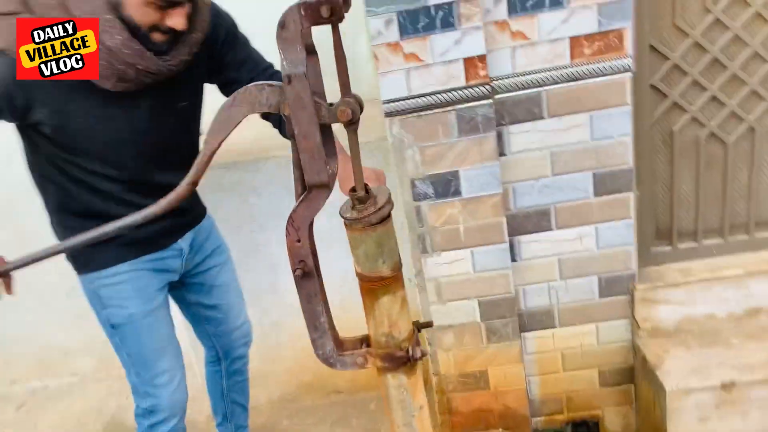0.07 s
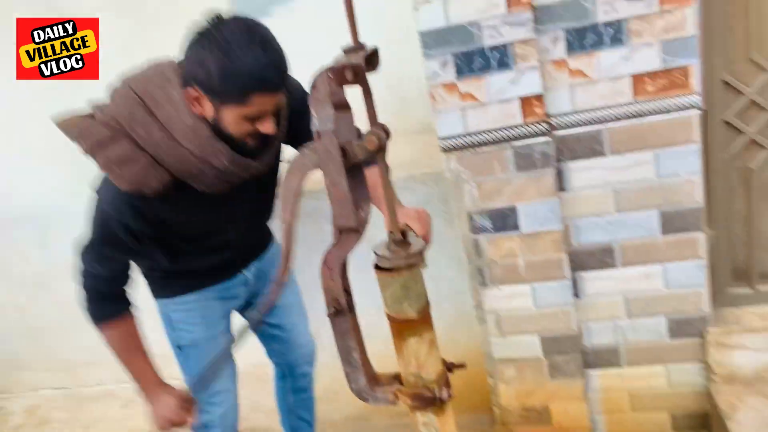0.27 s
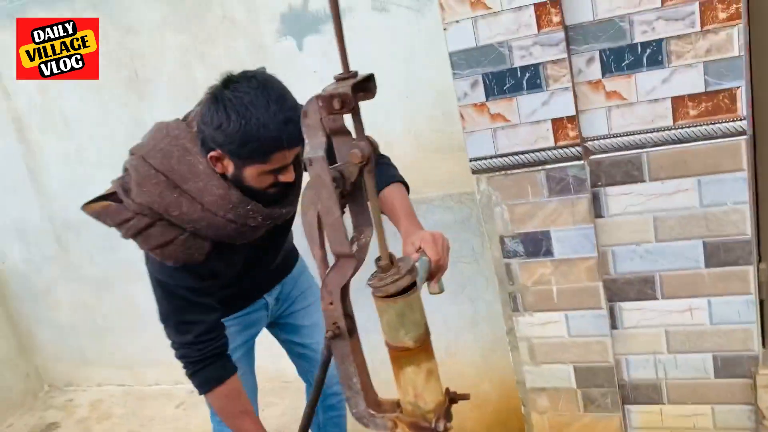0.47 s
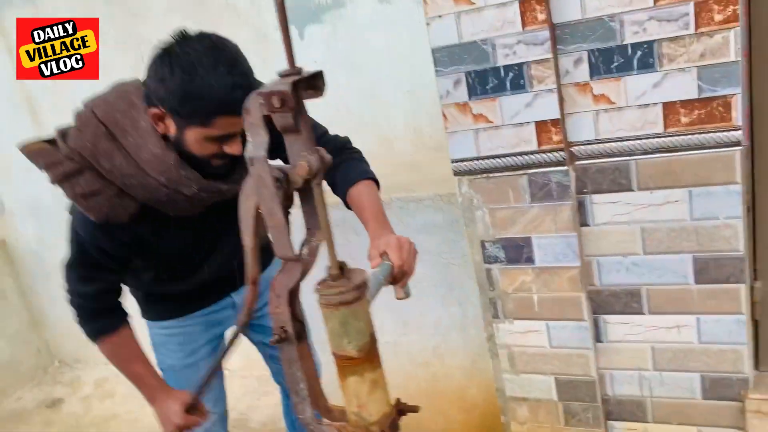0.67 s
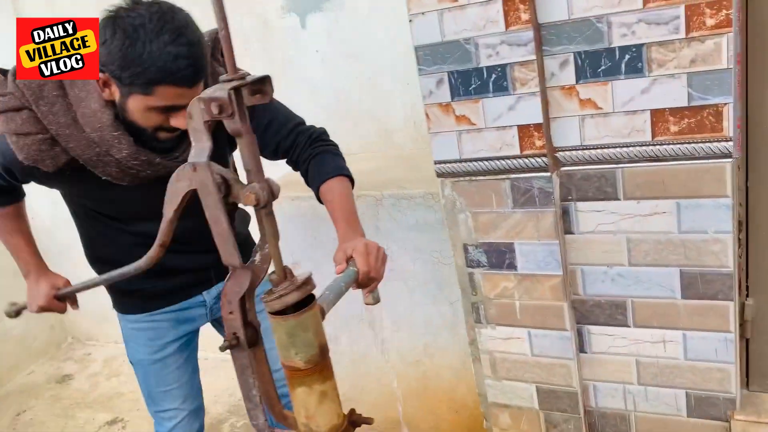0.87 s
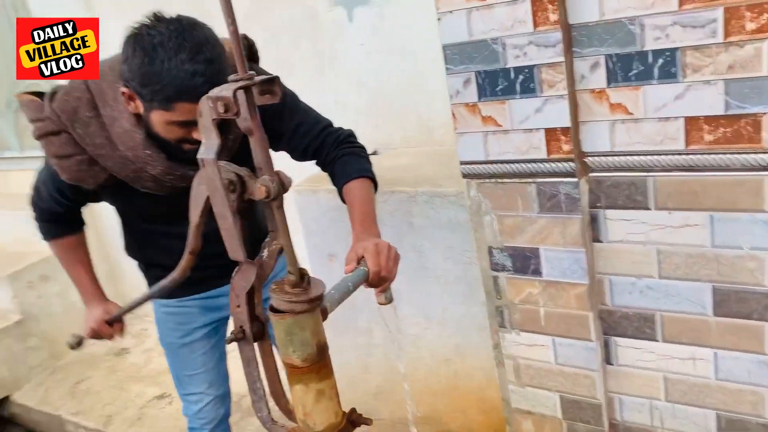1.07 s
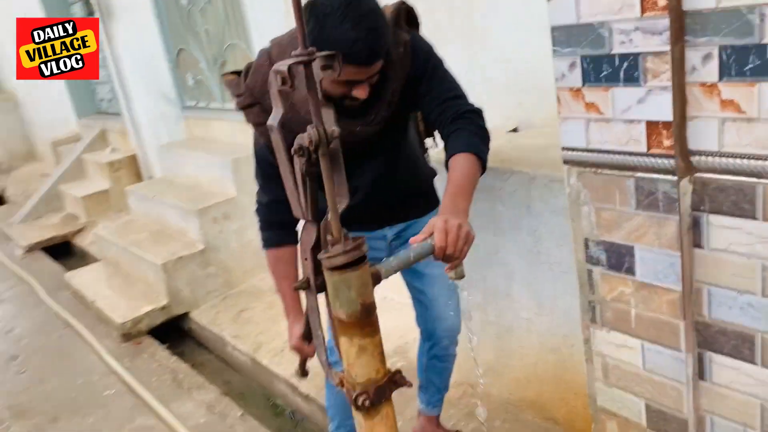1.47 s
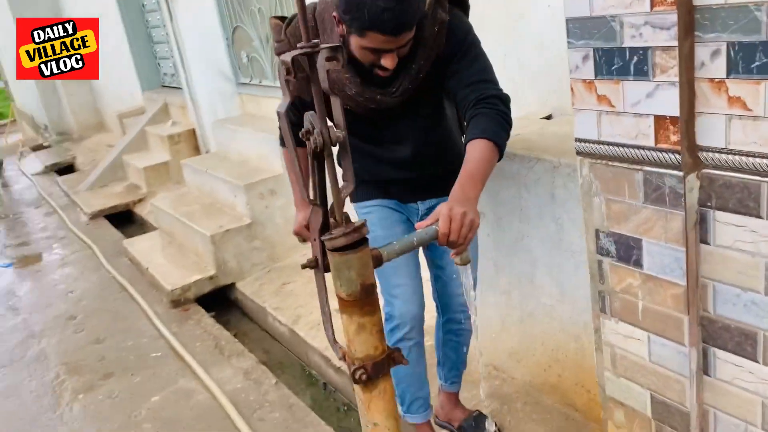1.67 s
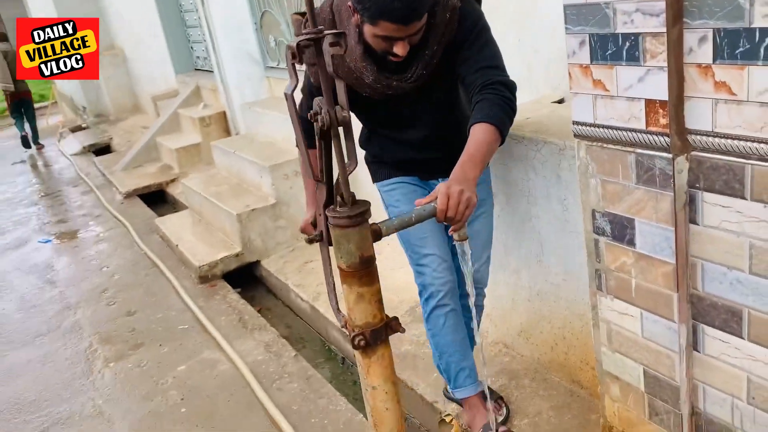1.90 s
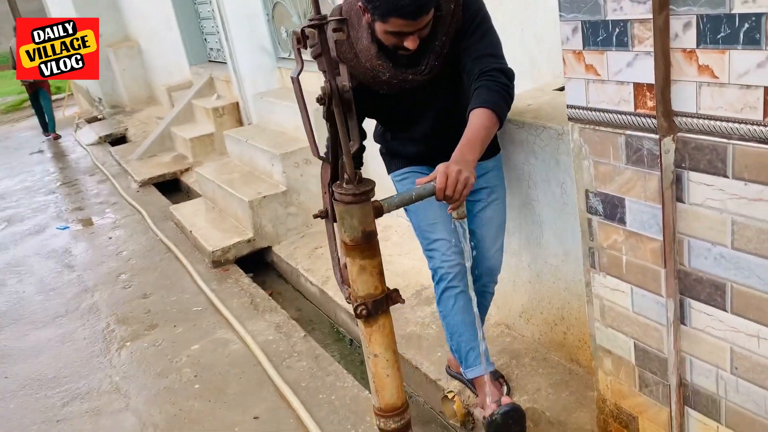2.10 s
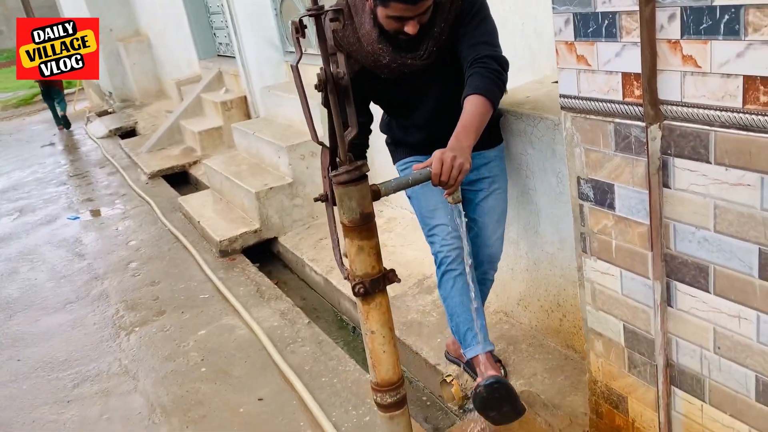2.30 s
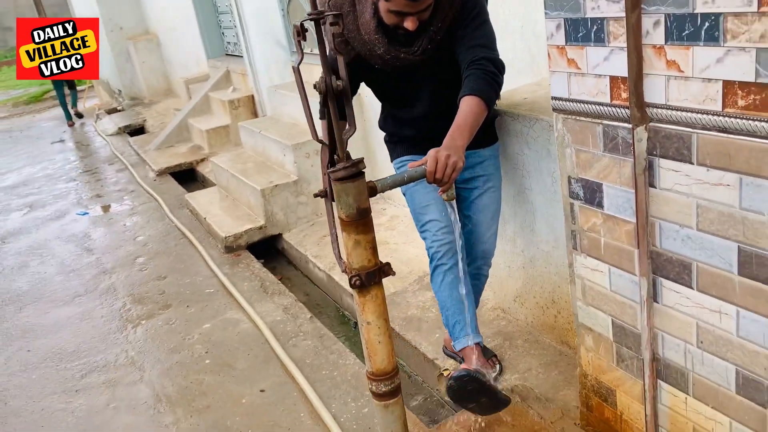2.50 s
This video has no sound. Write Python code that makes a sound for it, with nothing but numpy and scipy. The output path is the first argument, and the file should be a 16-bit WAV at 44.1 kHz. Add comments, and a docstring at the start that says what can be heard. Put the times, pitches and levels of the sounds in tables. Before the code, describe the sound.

Loose iron joints of a hand pump clank and ring in uneven clusters in a narrow outdoor lane. Water soon starts splashing on the ground with a few sharp drips, while a faraway engine chugs low and fades.

```python
"""A distant engine thuds, and almost at once an iron hand pump clanks in a narrow concrete lane.
The slow single cylinder gives one exhaust pulse per firing; it gathers speed, then eases off.
The pump is worked about once a second: at each turn its loose handle, links and rod collide,
and the impacts excite the modes of the iron. After a second, water spatters on the wet ground.
The walls reflect the sound of pump and water."""
import sys
import numpy as np
from scipy import signal
from scipy.fft import rfft, irfft
from scipy.io import wavfile

SR = 44100
rng = np.random.default_rng(int(sys.argv[2]) if len(sys.argv) > 2 else 0)


def store_pcm(level_fs):
    """Save levels as 16-bit WAV."""
    pcm = np.round(np.clip(level_fs, -1, 1) * 32767).astype(np.int16)
    wavfile.write(sys.argv[1], SR, np.atleast_2d(pcm).T)


N = 116865

# outdoor background spectrum (frequency [Hz], level [dB])
AIR_SPECTRUM = [(30, -27), (100, 1), (300, -22), (2500, -25), (9000, -35)]
# reverberation of the lane (frequency [Hz], time to fall 60 dB [s])
LANE_DECAY = [(100, 0.44), (1000, 0.55), (3000, 0.42), (7000, 0.36), (14000, 0.35)]

# engine speed (time [s], firing rate [Hz])
FIRING_RATE = [(0, 21.4), (.5, 21.4), (.8, 22), (1.1, 22.3), (1.5, 24.3), (1.9, 26), (2.05, 26.7),
               (2.35, 22.7), (2.65, 19.7)]
# envelope of the exhaust thuds (time [s], level [dB])
THUD_LEVEL = [(0, -40.5), (.4, -37.5), (.7, -35), (1.1, -39), (1.5, -41), (1.9, -47), (2.25, -48),
              (2.65, -49.5)]
# spectra of the exhaust and the engine's clatter (frequency [Hz], level [dB])
EXHAUST_SPECTRUM = [(20, -76), (32, -62), (44, -20), (70, 3.5), (110, -0.5), (170, 3), (250, -1.5),
                    (330, -11.5), (500, -18), (900, -33.5), (3000, -57)]
CLATTER_SPECTRUM = [(200, -6), (420, -0.5), (640, -7.5), (850, 2), (1100, -11.5), (1600, -14.5), (2300, -9),
                    (3500, -19), (6000, -22.5), (16000, -41)]
# droning harmonics (multiple of the firing rate [1])
ENGINE_ORDERS = (2, 4, 5, 7, 12)
# Gaussian swell of each order (peak time [s], standard deviation [s], level [dB])
ORDER_SWELLS = [(1.68, 0.7, -39.5), (2.28, 0.17, -42), (1.18, 0.68, -38.5), (0.47, 0.44, -36.5),
                (0.964, 0.18, -38)]

# water reaching the ground (time [s], level [dB])
SPATTER_LEVEL = [(0, -75), (.97, -53), (1.1, -25.5), (1.25, -41), (1.55, -38), (1.72, -42.5), (1.85, -39),
                 (2.07, -35.5), (2.25, -55.5), (2.35, -39.5), (2.5, -50), (2.65, -46.5)]
# spectrum of a drop's impact (frequency [Hz], level [dB])
SPLASH_SPECTRUM = [(550, -7), (900, 14), (1450, -0.5), (2600, 3.5), (5000, -0.5), (9000, -4), (15000, -2)]
# large drops slapping the concrete (time [s], peak level [dB])
LARGE_DROPS = [(1.381, -9.5), (1.5125, -12), (1.723, -14), (1.7895, -14.5), (1.878, -3), (2.079, -12.5),
               (2.343, -20), (2.433, -21)]

# plinks of the pins (time [s], peak level [dB], pitch [Hz])
PIN_PLINKS = [(1.190, -16.5, 2360), (1.7225, -14, 2454), (1.808, -21.5, 3870), (1.919, -15, 3330),
              (2.640, -26, 2240)]
# modes of handle and barrel (frequency [Hz], level [dB], time to fall 60 dB [s])
IRON_MODES = [(900, -7, .3), (1098, 0, .16), (1195, 0, .16), (1365, -6, .18), (1545, -5, .1),
              (2196, -2, .22), (2555, -3, .12), (3360, -4, .15), (3555, -5, .22), (3780, -6, .18),
              (4220, -4, .17), (4533, -6, .2), (6560, -6, .3)]
# spectra of struck iron, barrel rumble and impact crack (frequency [Hz], level [dB])
IRON_SPECTRUM = [(250, -20), (700, -11), (1080, -2.5), (1500, -1.5), (2300, 2), (3400, 0.5), (4700, -0.5),
                 (5700, -9), (6700, -3.5), (7400, -12.5), (8200, -4.5), (10500, -15), (14000, -11.5),
                 (16000, -21.5)]
BARREL_SPECTRUM = [(130, -13), (280, 0), (480, -8), (800, -4), (1500, -36.5)]
CRACK_SPECTRUM = [(3000, -9.5), (13000, -13.5)]
# clanks of the loose linkage, and two soft scrapes of the rod at 0.735 s and 2.123 s # (time [s], gain [dB],
# chatter length [s], tilt [dB/octave], ringing relative to chatter [dB], strongest pitch [Hz])
LINKAGE_CLANKS = [(0.1557, -17, 0.016, -0.5, -10, 1290), (0.2301, -25.5, 0.0051, -0.1, -11, 1800),
                  (.339, -31, 0.006, -2.5, -6, 2880), (0.404, -26.5, 0.011, -1, -10, 3350),
                  (.430, -23.5, 0.0094, -1, -9, 2050), (.471, -27.5, 0.071, -2, -15, 4430),
                  (0.519, -25.5, 0.014, 0.2, -12, 1310), (0.735, -36.5, 0.041, -2.5, -8.5, 2440),
                  (0.973, -38, 0.01, -0.5, -4, 2170), (1.0646, -20, 0.0033, -0.5, -5.5, 3500),
                  (1.081, -21.5, 0.026, -1.9, -4, 1060), (1.147, -27.5, 0.024, -2, -19, 1150),
                  (1.283, -28.5, 0.01, 1, -6.5, 2070), (1.323, -32, 0.018, 1.8, -14, 2350),
                  (1.379, -26, 0.034, 0.4, -11.5, 2870), (1.432, -28.5, 0.044, -2, -9, 1040),
                  (1.875, -28.5, 0.012, 4, -22, 8700), (1.886, -30.5, 0.018, -5.5, -21, 670),
                  (1.918, -30.5, 0.027, -1, -8, 3717), (1.957, -20.5, 0.013, -0.5, -8.5, 885),
                  (2.02, -29, 0.013, -2, -8, 2430), (2.123, -38.5, 0.028, 1.5, -24, 1950),
                  (2.292, -27.5, 0.014, 0.5, -13, 2330), (2.375, -38.5, 0.015, -6, -25, 2070)]

# microphone response (frequency [Hz], gain [dB])
MIC_RESPONSE = [(28, -10), (42, -0.5), (10600, 0.5), (11100, -8), (11550, -40), (12200, -3), (13600, -8),
                (15000, -14.5), (16400, -30)]
# left port relative to right (frequency [Hz], level difference [dB])
PORT_BALANCE = [(100, -1.5), (700, 0.5), (1290, -1), (4400, -4), (8100, 0.2)]
# left port relative to right (frequency [Hz], phase difference [rad])
PORT_SHIFT = [(100, -0.16), (1000, -0.52), (2400, -1.06), (4200, -1.37), (14000, -1.3)]


def amp(db):
    """Amplitude ratio of a level in decibels."""
    return 10 ** (np.asarray(db) / 20)


def unit_rms(x):
    """Normalisation to unit mean power."""
    return x / np.sqrt(np.mean(x ** 2) + 1e-20)


def at_hz(points, hz):
    """Interpolation on a logarithmic frequency axis."""
    f, value = np.transpose(points)
    return np.interp(np.log(hz + 1), np.log(f + 1), value)


def curve(points):
    """Linear interpolation of a time table at every sample."""
    return np.interp(np.arange(N) / SR, *np.transpose(points))


def bell(offset, width):
    """Gaussian weighting with a peak of one."""
    return np.exp(-.5 * (offset / width) ** 2)


def add(mix, start_s, sound):
    """Superposition of a stereo sound on the mix."""
    part = mix[:, round(start_s * SR):][:, :sound.shape[1]]
    part += sound[:, :part.shape[1]]


def convolve(x, response):
    """Convolution with an impulse response, cut to the input's length."""
    x = np.atleast_2d(x)
    return signal.fftconvolve(x, np.atleast_2d(response), axes=1)[:, :x.shape[1]]


def colour(x, spectrum, tilt=0, size=4096):
    """Minimum-phase filtering by a spectrum, tilted in dB per octave."""
    hz = abs(np.fft.fftfreq(size, 1 / SR))
    octaves = np.log2(np.clip(hz, 500, 10000) / 2000)
    log_gain = np.log(amp(at_hz(spectrum, hz) + tilt * octaves))
    response = np.fft.ifft(np.exp(np.conj(signal.hilbert(log_gain)))).real
    return convolve(x, response[:size // 2])


def noise(size, correlation):
    """Partially coherent white noise, left and right."""
    a, b = rng.standard_normal((2, size))
    return np.array([a, correlation * a + np.sqrt(1 - correlation ** 2) * b])


def air(level_db=-47.5):
    """Stationary noise: a faint, low outdoor background."""
    return amp(level_db) * unit_rms(colour(noise(N, correlation=1), AIR_SPECTRUM))


def lane(x, build_s=0.0023):
    """Reverberation: reflections from walls and ground decay exponentially, the treble first."""
    hz, t, bands = signal.stft(noise(SR // 2, correlation=0.033), SR, nperseg=256)
    decay = amp(-60 * t / at_hz(LANE_DECAY, hz)[:, None])
    onset = 1 - np.exp(-t / build_s)
    tail = signal.istft(bands * decay * onset, SR, nperseg=256)[1]
    return convolve(x, tail / np.linalg.norm(tail[0]))


def engine(wake_s=0.057, wake_db=-1.5, spread_db=1.5, puff_cycles=0.67, clatter_db=-1):
    """Periodic excitation: each firing gives a thud, a wake and clatter; harmonics of the rate drone."""
    t, cycles = np.arange(N) / SR, np.cumsum(curve(FIRING_RATE)) / SR
    firings = np.diff(np.floor(cycles), prepend=0) * amp(spread_db * rng.standard_normal(N))
    wake = signal.lfilter([1], [1, -np.exp(-1 / (wake_s * SR))], firings) * rng.standard_normal(N)
    thuds = unit_rms(colour(unit_rms(firings) + amp(wake_db) * unit_rms(wake), EXHAUST_SPECTRUM))
    puffs = 1 + np.exp(-(cycles % 1) / puff_cycles)
    clatter = unit_rms(colour(noise(N, correlation=0.54) * puffs, CLATTER_SPECTRUM))
    drone = np.zeros(N)
    for order, (peak_s, width_s, db) in zip(ENGINE_ORDERS, ORDER_SWELLS):
        harmonic = np.sqrt(2) * np.sin(2 * np.pi * (order * cycles + rng.random()))
        drone += amp(db) * bell(t - peak_s, width_s) * harmonic
    return amp(curve(THUD_LEVEL)) * (thuds + amp(clatter_db) * clatter) + drone


def drop(tilt=0, decay_s=0.002, size=1024):
    """Impact noise: a drop bursting on wet concrete radiates a brief broadband pulse."""
    burst = noise(size, correlation=0.17) * np.exp(-np.arange(size) / SR / decay_s)
    return colour(burst, SPLASH_SPECTRUM, tilt)


def water(drops_per_s=400, spread_db=6, kinds=16, lane_db=-4.5):
    """Shot noise: small drops land at random and merge; a few large, brighter ones stand out."""
    strengths = amp(spread_db * np.minimum(rng.exponential(1, N), 3.5))
    impacts = strengths * (rng.random(N) < drops_per_s / SR)
    kind = rng.integers(0, kinds, N)
    spatter = sum(convolve(impacts * (kind == k), drop()) for k in range(kinds))
    out = amp(curve(SPATTER_LEVEL)) * unit_rms(spatter)
    for start_s, peak_db in LARGE_DROPS:
        slap = drop(tilt=13.6)
        add(out, start_s, amp(peak_db) * slap / abs(slap).max())
    return out + amp(lane_db) * lane(out)


def iron_noise(size):
    """Broadband excitation of the iron, largely coherent between left and right."""
    return noise(size, correlation=0.86)


def pins(decay_s=0.002, grit_octaves=0.3, grit_db=-6, lane_db=-6, size=2048):
    """Damped oscillation: each pin plinks for a few cycles, with a band of grit around its pitch."""
    t, hz = np.arange(size) / SR, np.geomspace(100, 16000, 40)
    out = np.zeros((2, N))
    for start_s, peak_db, pitch in PIN_PLINKS:
        band = np.c_[hz, -10 * np.log10(1 + (np.log2(hz / pitch) / grit_octaves) ** 4)]
        grit = amp(grit_db) * unit_rms(colour(iron_noise(size), band))
        envelope = np.minimum(pitch * t / 2, 1) * np.exp(-t / decay_s)
        plink = (np.sin(2 * np.pi * pitch * t) + grit) * envelope
        add(out, start_s, amp(peak_db) * plink / abs(plink).max())
    return out + amp(lane_db) * lane(out)


def ring(t, length_s, focus_hz, lift_db=7, lift_octaves=0.08):
    """Resonance: modes build up during the chatter, then decay; those near focus_hz are lifted."""
    out = np.zeros((2, t.size))
    for hz, db, t60 in IRON_MODES:
        phase = rng.uniform(0, 2 * np.pi) + .5 * rng.standard_normal((2, 1))
        nearness = bell(np.log2(hz / focus_hz), lift_octaves)
        envelope = np.sqrt(np.minimum(t / length_s, 1)) * amp(-60 * np.maximum(t - length_s, 0) / t60)
        out += amp(db + lift_db * nearness) * envelope * np.sin(2 * np.pi * hz * t + phase)
    return unit_rms(out)


def chatter(t, length_s, release_s, tilt, focus_hz, knocks_per_s=4200, spots=2, t60=0.015):
    """Repeated impact: random knocks excite the short, dense impulse response of each spot of iron."""
    knocks = rng.choice([-1, 1], t.size) * (rng.random(t.size) < knocks_per_s / SR)
    knocks = knocks * np.exp(-np.maximum(t - length_s, 0) / release_s)
    knocks[0] = 1.65  # the first contact is the hardest
    spot = rng.integers(0, spots, t.size)
    decay = amp(-60 * t[:2048] / t60)
    crashes = sum(convolve(knocks * (spot == k), iron_noise(decay.size) * decay) for k in range(spots))
    hz = np.geomspace(100, 16000, 90)
    lift_db = 5 * bell(np.log2(hz / focus_hz), width=0.17)
    return unit_rms(colour(crashes, np.c_[hz, at_hz(IRON_SPECTRUM, hz) + lift_db], tilt))


def clank(length_s, tilt, ring_db, focus_hz, release_s=0.011, swell_s=0.031, crack_s=0.006, size=16384):
    """Impact excitation: a joint cracks and chatters, the iron rings and the barrel rumbles."""
    t = np.arange(size) / SR
    rattle = chatter(t, length_s, release_s, tilt, focus_hz)
    rumble = unit_rms(colour(iron_noise(size) * t * np.exp(-t / swell_s), BARREL_SPECTRUM))
    ringing = amp(ring_db) * ring(t, length_s, focus_hz)
    body = rattle + ringing + amp(-17 - 2 * tilt) * rumble  # duller clanks rumble more
    body *= np.sqrt((length_s + release_s) * SR / size)  # energy grows with duration
    crack = amp(-6) * unit_rms(colour(iron_noise(size), CRACK_SPECTRUM)) * np.exp(-t / crack_s)
    return body + crack


def pump(rub_s=0.008, rub_db=-19, lane_db=-5):
    """Backlash: each loose joint rubs as it takes up its slack, then clanks into the lane."""
    out, lead = np.zeros((2, N)), round(rub_s * SR)
    for impact_s, gain_db, length_s, tilt, ring_db, focus_hz in LINKAGE_CLANKS:
        impact = clank(length_s, tilt, ring_db, focus_hz)
        rub = amp(rub_db) * unit_rms(colour(iron_noise(lead), IRON_SPECTRUM)) * np.linspace(0, 1, lead)
        add(out, impact_s - lead / SR, amp(gain_db) * np.hstack([rub, impact]))
    return out + amp(lane_db) * lane(out)


def scene():
    """Superposition: the pressures of all sources add."""
    return pump() + pins() + water() + engine() + air()


def record(dry, cutoff_hz=16400):
    """Linear filtering: bass cut, treble notch, two ports that lean to the right, and a low-pass."""
    hz, side = np.fft.rfftfreq(N, 1 / SR), np.array([[.5], [-.5]])
    ports = amp(at_hz(PORT_BALANCE, hz) * side) * np.exp(1j * at_hz(PORT_SHIFT, hz) * side)
    heard = irfft(rfft(colour(dry, MIC_RESPONSE, size=16384)) * ports, N)
    lowpass = signal.firwin(511, cutoff_hz, window=("kaiser", 9), fs=SR)
    return signal.oaconvolve(heard, lowpass[None], "same")


dry = scene()
out = record(dry)
store_pcm(out)
```